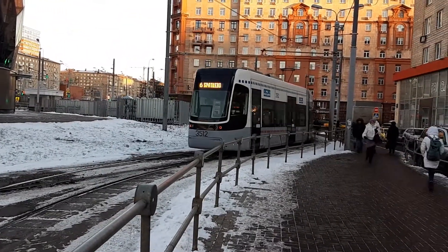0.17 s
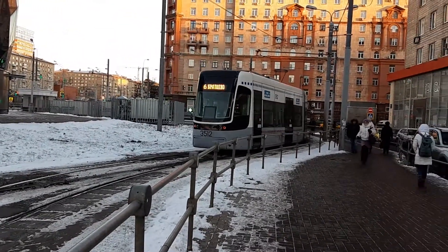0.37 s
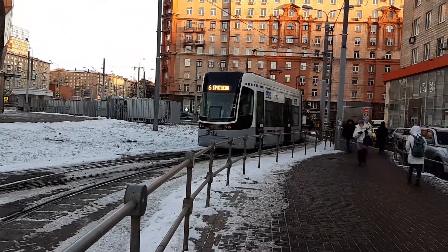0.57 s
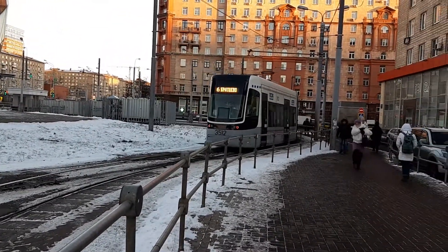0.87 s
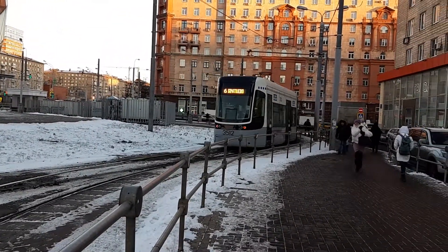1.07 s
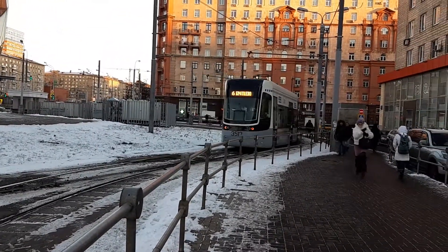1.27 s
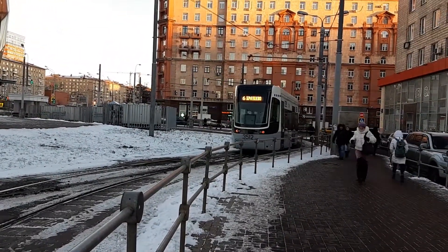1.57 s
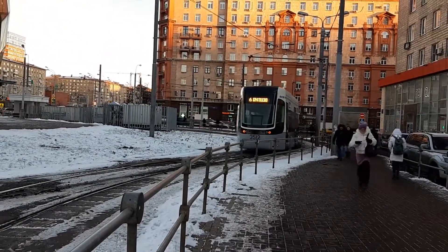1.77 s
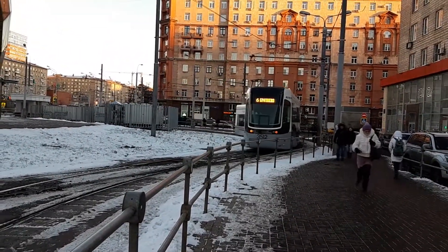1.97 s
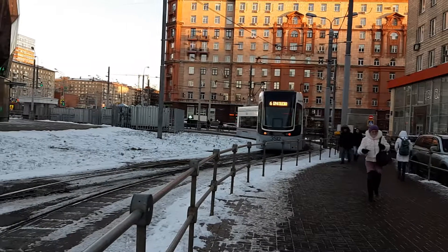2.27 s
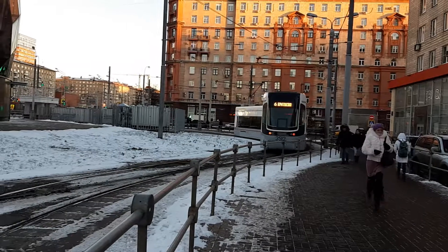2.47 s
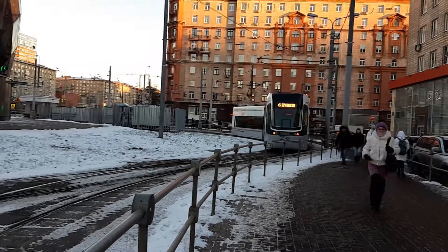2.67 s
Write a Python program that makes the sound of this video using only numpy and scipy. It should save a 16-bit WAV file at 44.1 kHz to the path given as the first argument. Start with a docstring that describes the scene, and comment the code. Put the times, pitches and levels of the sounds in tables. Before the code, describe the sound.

A tram's wheels squeal thinly round a curve over low rumble while hard heels trot past

```python
"""Over a steady low rumble and soft hiss, hard heels trot on the paving of a winter street.
A tram rounds a curve: its wheel flanges rub the rail and ring the wheels' thin modes all the while.
The squeal is a fluttering sine tone with narrow bands of noise; rumble, hiss and treble are shaped noise.
Grit rattles as bursts of tiny decaying sines, heel knocks are short rings, rail snaps short noise cracks.
Two spaced microphones hear it, with the tram to the right."""
import sys
import numpy as np
from scipy import signal
from scipy.fft import rfft, irfft, next_fast_len
from scipy.io import wavfile
from scipy.ndimage import uniform_filter1d, map_coordinates

SR = 44100
rng = np.random.default_rng(int(sys.argv[2]) if len(sys.argv) > 2 else 0)


def inscribe(sig):
    """Save sig as 16-bit PCM at rate SR to the path in sys.argv[1].

    A 1-D sig is mono; a 2-D sig holds one channel per row.
    Samples are clipped to [-1, 1] before scaling.
    """
    pcm = np.round(np.clip(np.atleast_2d(sig).T, -1, 1) * 32767)
    wavfile.write(sys.argv[1], SR, pcm.astype(np.int16))


N = 124362  # length in samples


def amp(db):
    """Turn decibels into a plain gain."""
    return 10 ** (np.asarray(db) / 20)


def unit(x):
    """Scale a sound to an average strength (rms) of 1."""
    return x / np.sqrt(np.mean(x ** 2) + 1e-20)


def along(points, hz):
    """Read a (frequency, value) curve, with frequency on a log axis as in hearing."""
    f, v = np.transpose(points)
    return np.interp(np.log(hz + 1), np.log(f + 1), v)


def curves(rows):
    """Join table points with straight lines: one curve for each column after the time."""
    times_s, *columns = np.transpose(rows)
    return [np.interp(np.arange(N) / SR, times_s, column) for column in columns]


def wobble(rate):
    """A smooth random curve through `rate` random points a second (at most 200)."""
    points = rng.standard_normal(int(N * 200 / SR) + 4)
    return map_coordinates(points, [np.arange(N) * min(rate, 200) / SR])


def filtered(x, response):
    """Change the strength and phase of each frequency in x by a response curve."""
    size = next_fast_len(N + SR // 2)  # spare room for tails
    spectrum = rfft(x, size) * response(np.fft.rfftfreq(size, 1 / SR))
    return irfft(spectrum, size)[..., :N]


def sides(pan_db):
    """Left and right gains, pan_db apart, that keep the mean power of the two channels."""
    gains = amp(np.array([pan_db / 2, -pan_db / 2]))
    return (gains / np.sqrt(np.cosh(pan_db * np.log(10) / 20))).reshape(2, -1)


def band(lo_hz, hi_hz, x):
    """Scale a stereo sound so that its left-right average has rms 1 between two frequencies."""
    return x / np.std(filtered(x.mean(0), lambda f: (f > lo_hz) & (f < hi_hz)))


def rush(spectrum, patchy_db):
    """Wide noise whose strength varies in random patches of time and pitch, shaped by a spectrum."""
    # How alike left and right are: pitch_hz, likeness (1 = same, 0 = unrelated, below 0 = opposed)
    likeness = [(60, 1), (130, 0.98), (290, 0.93), (640, 0.24), (1410, -0.42), (3100, 0.46), (6820, -0.18),
                (15000, 0.035)]
    z = signal.stft(rng.standard_normal((2, N)), nperseg=512)[2]
    patches = uniform_filter1d(rng.standard_normal(z.shape[1:]), 6, 0)
    patches = uniform_filter1d(patches, 10, 1)
    pair = signal.istft(z * amp(patchy_db * unit(patches)), nperseg=512)[1][:, :N]

    def mid_side_response(hz):
        angle = np.arccos(np.clip(along(likeness, hz), -1, 1)) / 2
        return amp(along(spectrum, hz)) * [np.cos(angle), np.sin(angle)]

    mid, side = filtered(pair, mid_side_response)
    return np.array([mid + side, mid - side])


def rubbed(hz, width_hz, alike):
    """A mode kept ringing by friction noise, rms 1; `alike` is the share common to both channels."""
    def resonance(f):
        return (1j * f * width_hz / (hz * hz - f * f + 1j * f * width_hz)) ** 2

    common, *separate = filtered(rng.standard_normal((3, N)), resonance)
    share = np.clip(alike, 0, 1)
    return unit(np.sqrt(share) * common + np.sqrt(1 - share) * np.array(separate))


def lagged(x, lag_s):
    """Sound from the right reaches the left microphone later, so the left channel is delayed."""
    return filtered(x, lambda f: np.exp(-2j * np.pi * f * lag_s * np.array([[1], [0]])))


def street():
    """Rolling and traffic rumble, rolling and street hiss and faint treble, all made from noise."""
    # Rumble strength: time_s, level_db
    rumble_level = [(0.0, -29), (0.78, -29.5), (1.0, -31), (1.08, -26.5), (1.1, -30.5), (1.41, -30.5),
                    (1.61, -26), (1.73, -29), (2.53, -31.5), (2.77, -31), (2.82, -29)]
    # Rumble colour: pitch_hz, relative_db_per_hz
    rumble_colour = [(15, -52), (25, -27), (65, -6), (134, -0.5), (194, -1), (240, -5.5), (281, -4.5),
                     (518, -16.5), (600, -56.5), (1320, -120)]
    # Hiss strength before a steady lift of 1.5 dB: time_s, level_db
    hiss_level = [(0.0, -42.5), (0.72, -42), (2.82, -42.5)]
    # Hiss colour: pitch_hz, relative_db_per_hz
    hiss_colour = [(260, -27), (450, -3), (650, -5.5), (1000, -4), (1600, -10.5), (2700, -17),
                   (4200, -12.5), (5200, -18), (6600, -19), (7600, -33), (9000, -117), (16000, -120)]
    # Hiss balance: pitch_hz, left_over_right_db
    hiss_pan = [(500, 0), (1500, -1), (3000, -7.5), (6000, 4.5)]
    # Treble strength before its random wobble: time_s, level_db
    air_level = [(0.0, -71), (0.44, -71.5), (1.09, -69.5), (1.29, -64.5), (1.58, -70), (2.28, -67),
                 (2.6, -68), (2.82, -69)]
    # Treble colour: pitch_hz, relative_db_per_hz
    air_colour = [(5000, -31), (7000, -3.5), (8300, -5), (10300, -0.5), (15000, -3.5), (16000, 1)]

    rumble = band(56, 330, rush(rumble_colour, patchy_db=1.5))
    rumble = amp(curves(rumble_level)[0]) * rumble * sides(pan_db=-1.2)

    def tilt(f):
        return amp(along(hiss_pan, f) / 2 * np.array([[1], [-1]]))

    hiss = band(500, 2700, filtered(rush(hiss_colour, patchy_db=.6), tilt))
    hiss = amp(curves(hiss_level)[0] + 1.5) * hiss

    air = band(13750, 14950, rush(air_colour, patchy_db=2.1))
    air_db = curves(air_level)[0] + 1.5 * wobble(rate=14)
    air = amp(air_db) * air * sides(pan_db=1.8)
    return rumble + hiss + air


def snaps():
    """The rail snaps: each dry crack is a quickly fading burst of noise with its own colour."""
    # Each snap: start_s, then peak levels before panning upper_db, low_db, middle_db, treble_db,
    # and left_over_right_db
    snap_list = [(0.2447, -31, -18.5, -21, -30.5, -6), (0.371, -24, -28, -16, -28, -9),
                 (0.4838, -31.5, -30, -23, -41, -10), (0.847, -40, -27, -26, -63, -4),
                 (0.9613, -38, -24, -26, -56, 1), (1.047, -25.5, -24.5, -22, -40, -2),
                 (1.12, -41, -17.5, -44, -58, 3), (1.3918, -19.5, -46, -24, -28.5, -3),
                 (2.299, -33, -32, -38, -52, -2)]
    # Bands in the same order as those levels: from_hz, to_hz
    snap_bands = [(5200, 7000), (800, 3000), (4100, 4700), (9000, 16500)]
    rise_s, t60_s = .0012, .012  # t60: time to fade by 60 dB
    out, t = np.zeros((2, N + SR)), np.arange(1000) / SR
    filters = [signal.butter(3, edges, "band", fs=SR, output="sos") for edges in snap_bands]
    shape = amp(-60 * t / t60_s) * np.minimum(t / rise_s, 1) ** 2
    for start_s, *levels_db, pan_db in snap_list:
        noise = rng.standard_normal((2, len(t)))
        crack = 0
        for sos, db in zip(filters, levels_db):
            part = signal.sosfilt(sos, noise) * shape
            crack = crack + amp(db) * part / np.abs(part).max(1, keepdims=True)
        out[:, round(start_s * SR):][:, :len(t)] += crack * sides(pan_db)
    return out[:, :N]


def rattle():
    """Grit rattles in bursts: a dense crowd of tiny fading sines, stronger on the right."""
    # Strength of the rattle: time_s, level_db
    rattle_level = [(0.0, -58), (0.47, -50), (0.62, -59), (0.89, -39.5), (1.02, -44), (1.07, -38),
                    (1.15, -48.5), (1.55, -49), (1.58, -39.5), (1.78, -47), (1.81, -44), (1.92, -48),
                    (2.08, -35), (2.12, -42), (2.24, -48), (2.26, -39), (2.33, -38), (2.35, -52),
                    (2.82, -63)]
    pitch_hz, pitch_spread, ring_cycles = 3264, .14, 5  # spread is on a log scale
    mean_size_db = 2.8  # many small grains, a few large ones
    count = round(1600 * N / SR)  # 1600 grains a second
    place, chance, left_gain = rng.random((count, 3)).T[:, :, None]
    t = np.arange(400) / SR
    hz = pitch_hz * np.exp(pitch_spread * rng.standard_normal((count, 1)))
    size = amp(-mean_size_db * np.log(chance))
    envelope = np.exp(-t * hz / ring_cycles) * (1 - np.exp(-t * hz))
    grains = size * envelope * np.sin(2 * np.pi * hz * t)
    at = (place * N).astype(int) + np.arange(400)
    # Add up all grains; each has a random gain on the left and full gain on the right
    pair = [np.bincount(at.ravel(), (grains * gain).ravel(), N + 400)[:N] for gain in (left_gain, 1)]
    return amp(curves(rattle_level)[0]) * unit(np.array(pair))


def knocks():
    """Hard heels knock the paving, and one off-rhythm knock at 1.0463 s rings the same way."""
    # Each knock: start_s, peak_db before panning, left_over_right_db
    knock_list = [(.2383, -20, -1), (.5053, -19.5, 1), (.7906, -21, -3), (1.0463, -13.5, -1),
                  (1.0891, -17, 2), (1.3801, -15.5, -1), (1.6599, -15.5, 0), (1.9672, -16, 0),
                  (2.2517, -14, 2), (2.5307, -15.5, 1)]
    # Rings in one knock, lowest first: pitch_hz, relative_db, t60_s (time to fade by 60 dB)
    knock_modes = [(330, -9, .014), (1080, -3, .013), (1400, -1, .011), (2050, -6, .006)]
    out, t = np.zeros((2, N + SR)), np.arange(2000) / SR

    def ring(hz, db, t60):
        return amp(db - 60 * t / t60) * np.sin(2 * np.pi * hz * t)

    low, *upper = knock_modes
    # The upper rings push the opposite way to the low one: a dip, then a thump
    knock = ring(*low) - sum(ring(*mode) for mode in upper)
    knock = knock * (1 - np.exp(-t / .00012))  # soften the very start
    knock = knock / np.abs(knock).max()
    for start_s, db, pan_db in knock_list:
        out[:, round(start_s * SR):][:, :len(t)] += amp(db) * knock * sides(pan_db)
    return out[:, :N]


def squeal():
    """Flanges rub the rail: one wheel mode sings as a fluttering tone, others ring as narrow noise."""
    # Loudest wheel mode: time_s, level_db
    squeal_level = [(0.0, -56), (0.14, -42), (0.34, -46.5), (0.38, -40.5), (0.41, -52), (0.64, -52.5),
                    (0.72, -38.5), (0.78, -42.5), (0.79, -43), (1.22, -38.5), (1.25, -41.5), (1.46, -29),
                    (1.48, -34.5), (1.63, -41.5), (1.66, -32.5), (1.69, -43.5), (1.82, -40), (1.84, -27.5),
                    (1.95, -47.5), (1.97, -35), (2.14, -43), (2.18, -30.5), (2.21, -52), (2.23, -32),
                    (2.33, -25.5), (2.36, -31.5), (2.43, -22), (2.49, -28), (2.51, -36), (2.54, -26.5),
                    (2.58, -21.5), (2.61, -67), (2.65, -38), (2.68, -23.5), (2.73, -36), (2.76, -23),
                    (2.82, -38)]
    # Balance of the loudest mode: time_s, left_over_right_db
    squeal_pan = [(0.0, -6), (0.78, -13), (1.31, 6), (1.35, -8.0), (2.14, -8), (2.28, -11), (2.82, -14.5)]
    # Other modes: time_s, low_mode_db, rail_mode_db, middle_mode_db, high_modes_db
    # (high_modes_db is before the parts that follow the loudest mode and wobble)
    neighbour_levels = [(0.0, -60, -50, -51.5, -64), (0.29, -65, -55, -56, -68), (0.42, -71, -49, -56, -67),
                        (0.67, -60, -52, -54, -65), (0.99, -51, -50, -57, -67.5),
                        (1.23, -47, -55, -49.5, -60), (1.49, -48.5, -55, -44.5, -64.5),
                        (1.8, -46, -48, -46.5, -58), (2.17, -49, -57, -48.5, -64.5),
                        (2.42, -57, -53, -50, -59), (2.82, -64, -51, -50, -58.5)]
    # High wheel modes: pitch_hz, width_hz, relative_db
    high_modes = [(7348, 90, -6), (8890, 110, -5), (10470, 200, -3), (12036, 120, -1), (12580, 240, -4),
                  (13600, 130, -3), (15180, 300, -3)]
    pitch_hz, waver_hz = 4333, 17
    flutter_db, flutter_rate = 1.6, 90  # rate in random points a second
    echo_s, skirt_db = 0.17, -3.5  # the reflections smear the level over echo_s
    high_follow = .25  # dB the high modes move for each dB of the loudest mode

    phase = 2 * np.pi * np.cumsum(pitch_hz + waver_hz * wobble(rate=45)) / SR
    tone = unit(np.sin(phase) * amp(flutter_db * wobble(flutter_rate)))
    level_db, = curves(squeal_level)
    level = amp(level_db)
    main = level * tone * sides(curves(squeal_pan)[0])

    # A skirt of narrow noise around the tone
    smeared = uniform_filter1d(level, round(echo_s * SR))
    skirt = smeared * amp(skirt_db) * rubbed(pitch_hz, width_hz=70, alike=0.17) * sides(pan_db=-13)

    low_db, rail_db, middle_db, high_db = curves(neighbour_levels)
    near = amp(low_db) * rubbed(hz=2966, width_hz=38, alike=0.96)
    near = near + amp(middle_db) * rubbed(hz=5824, width_hz=100, alike=0.078)
    near = near + amp(rail_db) * rubbed(hz=3440, width_hz=110, alike=0.52)  # ring of the rail

    high = 0
    for hz, width_hz, db in high_modes:
        high = high + amp(db + 3.5 * wobble(rate=14)) * rubbed(hz, width_hz, alike=0.27)
    high = high * amp(high_db + high_follow * (level_db - level_db.mean()))
    return main + skirt + near * sides(pan_db=-5) + high * sides(pan_db=1)


def scene():
    """Add the sources; the left channel lags less for the knocks, as the heels are nearer the middle."""
    background = street() + snaps()
    tram = lagged(rattle() + squeal(), lag_s=12 / 44100)
    paving = lagged(knocks(), lag_s=6.5 / 44100)
    return background + tram + paving


def record(dry):
    """Keep only frequencies below a sharp upper limit."""
    return filtered(dry, lambda hz: hz < 15740)


dry = scene()
out = record(dry)
inscribe(out)
```